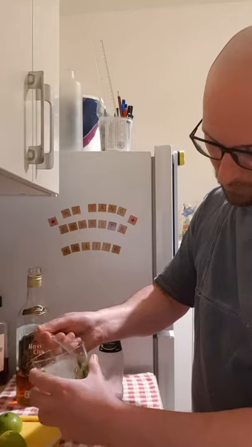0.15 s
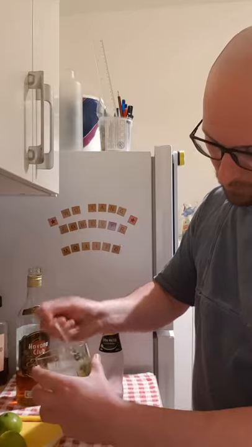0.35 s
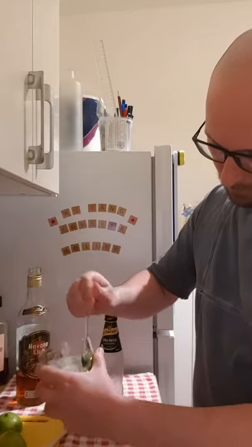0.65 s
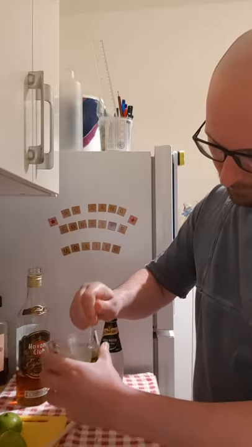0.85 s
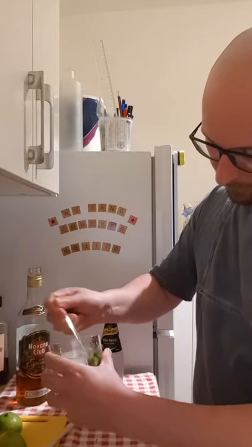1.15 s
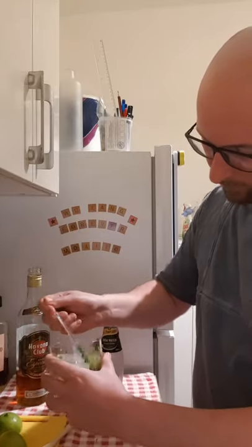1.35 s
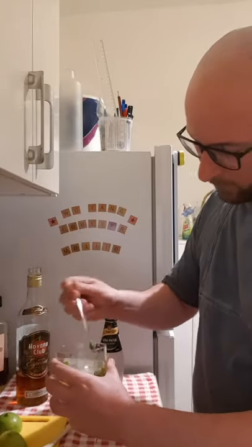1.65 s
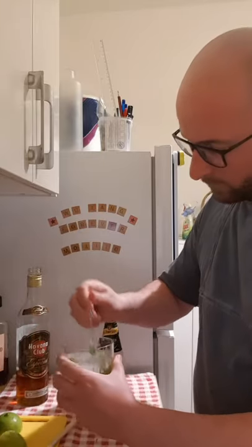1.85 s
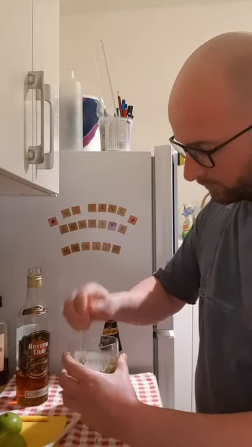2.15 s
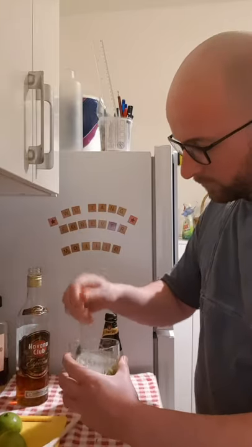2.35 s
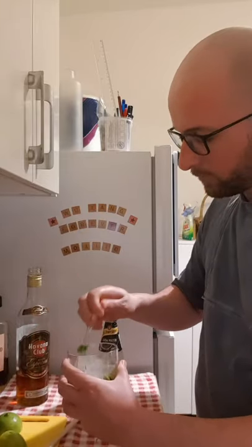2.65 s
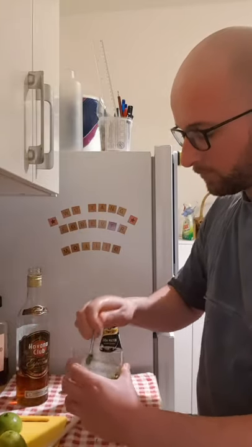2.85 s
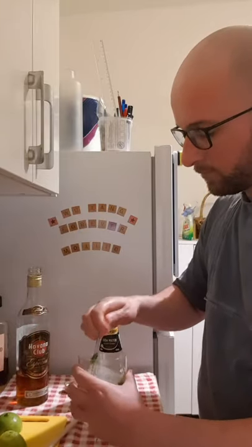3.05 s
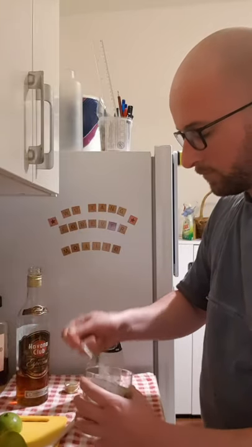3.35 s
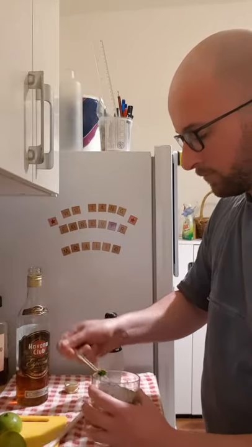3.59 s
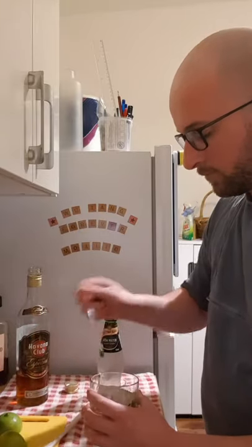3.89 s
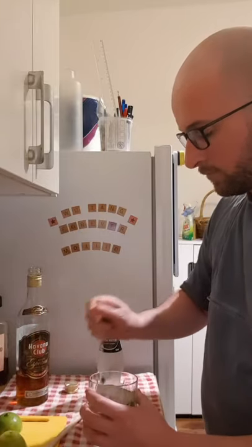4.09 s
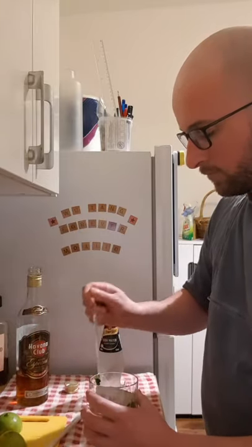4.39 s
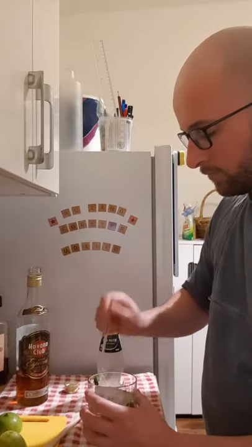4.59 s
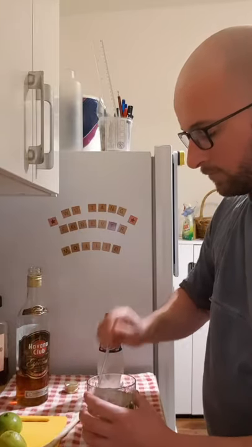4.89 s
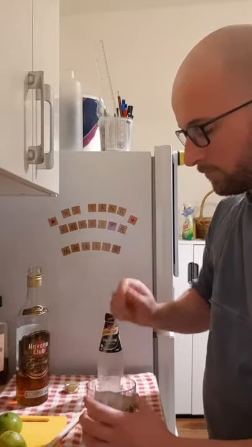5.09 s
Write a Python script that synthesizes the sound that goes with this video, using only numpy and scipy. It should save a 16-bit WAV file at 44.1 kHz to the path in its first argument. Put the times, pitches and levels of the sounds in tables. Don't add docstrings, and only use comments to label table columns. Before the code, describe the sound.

Close, uneven clinks and clacks of spoon and ice in a hand-held glass, with brief scrapes, short room echo and faint fridge whine.

```python
import sys
import numpy as np
from scipy import signal
from scipy.fft import rfft, irfft
from scipy.io import wavfile
from scipy.ndimage import uniform_filter1d

SR = 44100
rng = np.random.default_rng(int(sys.argv[2]) if len(sys.argv) > 2 else 0)


def volts(x):
    e = np.asarray(x, float) / 20
    return 10 ** e


def pcm_store(signal):
    levels = np.round(np.clip(np.atleast_2d(signal), -1, 1) * 32767)
    wavfile.write(sys.argv[1], SR, levels.astype(np.int16).T)


N = 230598


def evened(x):
    return x / np.sqrt(np.mean(x ** 2) + 1e-20)


def read(points, hz):
    f, value = np.transpose(points)
    return np.interp(np.log(hz + 1), np.log(f + 1), value)


def add(mix, start_s, sound):
    part = mix[:, round(start_s * SR):][:, :sound.shape[1]]
    part += sound[:, :part.shape[1]]


def seesaw(db, share, span_db):
    tilt = span_db * (share - 0.5)
    return db - max(tilt, 0), db + min(tilt, 0)


def ring(hz, t60, split_hz, db, luck, rise=0.0011, spread=0.0029):
    aim, phase, port_phase, split, detune, _ = luck
    t = np.arange(6000) / SR
    lean = volts(2.5 * (1.6 * aim - 2.5) * np.array([[1], [-1]]))
    hz = hz * (1 + spread * (2 * detune - 1))
    partner_hz = hz - split_hz * (0.5 + split)
    turn = 2 * np.pi * phase + 2 * port_phase * np.array([[0], [1]])
    pair = np.sin(2 * np.pi * hz * t) + 0.3 * np.sin(2 * np.pi * partner_hz * t + turn)
    pair *= 1 + 0.83 * np.exp(-t / 0.001)
    return volts(db - 60 * t / t60) * (1 - np.exp(-t / rise)) * lean * pair


def burst(colour, db, t60, alike=1.0, size=2048):
    shared, *own = rng.standard_normal((3, size))
    noise = alike * shared + np.sqrt(1 - min(alike, 1) ** 2) * np.array(own)
    gain = volts(read(colour, np.fft.rfftfreq(size, 1 / SR)))
    noise = evened(irfft(rfft(noise) * gain))
    t = np.arange(size) / SR
    return noise * volts(db - 60 * t / t60) * (1 - np.exp(-t / 0.00042))


# start_s, level_db, pitch_hz (lowest ring), wall height 0-1, hardness 0-1
FIRM_BLOWS = [(.0376, -35, 2228, 0.2, 0.4), (.4207, -36, 2053, 0.5, 0.59), (.4525, -45.5, 2030, 0.6, 0.8),
              (0.5586, -48.5, 2195, 0.9, 1.1), (0.7153, -41, 2028, 0.51, 0.35),
              (0.8256, -48.5, 2040, 0.63, 0.77), (1.0934, -20, 2043, 0.22, 0.63),
              (1.0984, -18.5, 1996, 0.67, 0.5), (1.1025, -22.5, 2006, 0.67, 0.45),
              (1.662, -46.5, 2110, 0.6, 0.69), (1.8498, -51, 2056, 0.53, 0.52),
              (2.2155, -25, 2070, 0.13, 0.55), (2.2824, -34.5, 2070, 0.47, 0.39),
              (2.4416, -38, 2115, 0.35, 0.34), (2.5729, -42.5, 2127, .02, 0.24),
              (2.599, -28, 2237, 0.27, 0.39), (2.7733, -18, 2060, 0.3, 0.6),
              (2.8015, -27.5, 2062, 0.38, 0.45), (2.8457, -31, 1963, 0.47, 0),
              (2.8518, -30, 2137, 0.66, 0.73), (2.8605, -32, 2140, 0.7, 0.53),
              (4.2132, -43, 2105, 0.51, 0.84), (4.2832, -30.5, 2056, 0.63, 0.35),
              (4.7788, -31, 2062, 0.41, 0.45), (4.8878, -26.5, 2028, 0.42, 0.57),
              (4.9173, -38.5, 2053, 0.56, 0.32)]
ICE_NUDGES = [(0.018, -44, 2187, .42, 0.26), (.6272, -50, 2020, 0.56, 0), (1.0387, -62, 2190, .38, 0.1),
              (1.0696, -47, 2080, 0.8, 0), (1.6551, -53.5, 2140, .45, 0.7), (1.7104, -56, 2020, 0.1, 0.5),
              (1.7753, -51.5, 2124, 0, 0.2), (1.8122, -54.5, 2050, .03, 0.15),
              (1.9193, -55.5, 2160, 0.58, 0.22), (2.0964, -64, 2140, .14, 0.54),
              (2.3271, -66, 2230, .76, 0.3), (2.653, -44.5, 2260, 0.8, 0.45),
              (3.4399, -55.5, 2030, 0.61, 0.18), (3.5219, -60.5, 2140, 0.9, 0.4),
              (3.6325, -59.5, 2060, 0.63, 0.4), (3.6694, -53, 2040, 1, .6), (3.7406, -54.5, 2106, .1, 0.58),
              (3.7584, -50.5, 2040, 0.58, 0.32)]
# pitch_hz, t60_s, split_hz of the close pair, gain_db
LOW_RINGS = [(2056, 0.036, 51, 8), (2910, 0.046, 40, 5), (4210, 0.04, 70, 3.5)]
# pitch_hz, level_db
THUD_COLOUR = [(250, -27.5), (450, -5), (680, -9.5), (950, -14.5), (1350, -8.5), (1700, -3.5), (2500, -4),
               (3500, -17), (5000, -25.5)]


def knocks():
    blows = FIRM_BLOWS + ICE_NUDGES
    out, luck = np.zeros((2, N)), rng.random((len(blows), 3, 6))
    for (start_s, force_db, low_hz, height, hard), chances in zip(blows, luck):
        shift = low_hz / LOW_RINGS[0][0]
        pitches = [low_hz, 2895 * shift ** 0.45, 4305 * shift ** 0.3]
        lowest_db, second_db = seesaw(force_db, height, 52)
        levels = lowest_db, second_db, force_db - 29.5 + 37 * hard
        for hz, (_, t60, split, gain_db), level, chance in zip(pitches, LOW_RINGS, levels, chances):
            add(out, start_s, ring(hz, t60, split, gain_db + level, chance, spread=0.0019))
        thud_db = -45 + 0.84 * (force_db + 45) + 4.5 - 26.5 * hard
        add(out, start_s, burst(THUD_COLOUR, thud_db, 0.056))
    return out


# start_s, level_db, push
METAL_TICKS = [(.038, -60, 0.57, .1, .14), (.4208, -56.5, 0.6, 0.42, 0.58), (0.5601, -50, 0.36, 0.62, .25),
               (0.7159, -63.5, 0.59, .6, 0.3), (0.8263, -52.5, 0.52, .25, 0.42),
               (1.0933, -39.5, 0.62, 0.46, 0.42), (1.3925, -60.5, 0.12, 1, 1),
               (1.785, -59, 0.41, .51, 0.66), (2.0976, -57.5, 0.54, 0.55, 0.59),
               (2.2118, -60.5, 0.2, .51, 0.35), (2.2161, -44, 0.64, 1, 0.53),
               (2.4213, -53, 0.52, .63, 0.49), (2.4428, -61.5, 0.72, .45, 0.5),
               (2.543, -61.5, 0.1, 0.3, 0.5), (2.5465, -56.5, 0.2, 0.3, 0.45), (2.572, -61, 0.63, .72, 0.3),
               (2.6, -62.5, 0.7, .27, 0.1), (2.774, -46, 0.3, 0.6, .45), (2.8444, -47.5, 0.68, 0.6, 0.45),
               (4.2149, -39.5, 0.28, 0.35, 0.6), (4.2843, -56, 0.4, 0.4, .44),
               (4.741, -47.5, 0.38, 0.6, 0.61), (4.779, -57.5, 0.57, .98, .18),
               (4.888, -51, 0.55, 0.57, 0.3),
               (.9176, -68, 0.45, 0.8, 0.1), (1.0386, -63, 0.3, 0.37, 0.34), (1.071, -67, 0.2, 0.8, 0.2),
                (1.0888, -60, 0.2, 0.4, 0.2), (1.381, -70, .17, 0.54, 0.25), (1.659, -73, 0.84, 0.5, .7),
                (1.8512, -68, 0.82, 0.56, 0.55), (1.9204, -71, .05, 0.85, .32),
                (1.952, -70, 0.07, .83, 0.52), (1.9764, -74, .02, 0.86, .7), (2.19, -65, 0.2, .5, 0.5),
                (2.719, -65, 0.3, .82, .64), (3.0652, -72, 0.5, .72, 0.65), (3.0887, -74, .1, .98, 0.7),
                (3.4256, -62, 0.3, 0.55, 0.56), (3.522, -65, 0.5, 0.86, 0.5),
                (3.634, -76.5, 0.77, .83, .68), (3.74, -79, 0.96, .67, .32), (3.7614, -76, 0.85, .74, .17),
                (5.0106, -69, .16, 0.9, 0.65)]
# pitch_hz, t60_s, split_hz of the close pair, gain_db
HIGH_RINGS = [(6417, 0.037, 30, 2.3), (9120, 0.038, 370, 1.5), (12100, 0.022, 380, 7.1)]
# pitch_hz, level_db
DULL_CRACK = [(1100, -34.5), (1600, -15), (2100, -3), (3400, -8), (5200, 0.5), (7200, -2), (8000, -8),
              (9000, -29)]
# pitch_hz, level_db
BRIGHT_CRACK = [(6000, -33.5), (9000, -5), (10800, 1.5), (12300, -0.5), (14000, -2), (16500, -8)]


def ticks():
    contacts = METAL_TICKS
    out, luck = np.zeros((2, N)), rng.random((len(contacts), 3, 6))
    for (start_s, force_db, push, loose, sharp), chances in zip(contacts, luck):
        rim_db, spoon_db = seesaw(force_db, loose, 60.5)
        dull_db, bright_db = seesaw(force_db, sharp, 52.5)
        wall_db = force_db - 13 + 45.5 * push
        levels = wall_db, rim_db + 9, spoon_db + 5.5
        for (hz, t60, split, gain_db), level, chance in zip(HIGH_RINGS, levels, chances):
            add(out, start_s, ring(hz, t60, split, gain_db + level, chance, rise=0.00086))
        dull = burst(DULL_CRACK, dull_db + 17.5, 0.019)
        bright = burst(BRIGHT_CRACK, bright_db + 14.5, 0.029)
        add(out, start_s, dull + bright)
    return out


# start_s, pitch_hz, level_db,
# t60_s
DEAD_CONTACTS = [(0.0372, 2000, -21, 0.0098), (0.038, 1610, -29.5, 0.023), (0.039, 1370, -40, 0.03),
                 (0.02, 1550, -47, 0.02), (0.61, 4100, -46, 0.034), (0.89, 1800, -40, 0.0038),
                 (0.827, 2900, -38.5, 0.023), (.8264, 3180, -31.5, .0086), (1.0935, 3430, -33.5, 0.026),
                 (1.094, 1355, -26, 0.05), (1.0945, 1555, -29, 0.04), (1.095, 2190, -23, 0.046),
                 (1.097, 2340, -27, 0.035), (1.096, 4120, -30, 0.051), (1.0942, 4245, -24.5, 0.056),
                 (2.217, 4306, -33.5, 0.025), (2.779, 4312, -33, 0.057), (1.0945, 10000, -34, .008),
                 (2.216, 1430, -37.5, 0.0096), (2.2, 420, -50.5, 0.027), (2.599, 1775, -36.5, 0.033),
                 (2.774, 3520, -34.5, 0.012), (2.846, 661, -33.5, 0.025), (2.8462, 5370, -46, 0.0088),
                 (2.851, 2480, -28, 0.011), (3.425, 2520, -54, 0.0093), (3.543, 3530, -57, 0.044),
                 (3.663, 2800, -54, 0.051), (4.2137, 6250, -21, 0.0088), (4.2158, 6280, -16, 0.0091),
                 (4.2126, 2700, -34, 0.0072), (4.2138, 7320, -17.5, 0.012), (4.2136, 3960, -32, 0.0081),
                 (4.2162, 3000, -33, 0.02), (4.3, 4660, -38.5, 0.018), (4.7787, 674, -41.5, 0.045),
                 (4.888, 770, -41, 0.021), (6.4, 2200, -37, 0.031), (2.8465, 1566, -33, 0.03)]


def clacks():
    out, luck = np.zeros((2, N)), rng.random((len(DEAD_CONTACTS), 6))
    for (start_s, hz, db, t60), chance in zip(DEAD_CONTACTS, luck):
        add(out, start_s, ring(hz, t60, 3.7 / t60, db, chance, rise=0.00081))
    return out


# pitch_hz, level_db
SPLASH_COLOUR = [(1200, -31.5), (1900, 2.5), (2250, 5.5), (2600, -3), (3300, 1), (4000, -1), (5300, -5),
                 (7500, -14)]


def splash():
    out = np.zeros((2, N))
    for start_s, force_db, *_ in FIRM_BLOWS + ICE_NUDGES:
        add(out, start_s, burst(SPLASH_COLOUR, force_db - 16, 0.049, alike=0.9))
    return out


# start_s, level_db (pressure)
STROKES = [
    [(1.67, -58), (1.702, -65), (1.846, -63.5), (1.854, -57), (1.878, -75), (1.944, -62), (2.05, -99)],
    [(2.806, -48.5), (2.842, -49.5), (2.846, -34.5), (2.862, -35), (2.885, -52)],
    [(4.214, -36), (4.235, -41), (4.28, -45), (4.33, -57)],
    [(3.43, -58.5), (3.51, -67), (3.524, -65), (3.578, -60.5), (3.774, -54), (3.78, -74.5), (3.92, -76)],
]
# pitch_hz, level_db
SCRATCH = [(1500, -48), (2500, -18), (5000, -11.5), (7500, -21), (11000, -26.5), (16000, -28)]
SLIDE_RINGS_DB = [-4.5, -8, -7.5, -2, -14, -12]


def slides():
    slips_per_s = 1500
    slips = (rng.random(N) < slips_per_s / SR) * volts(rng.exponential(1, N)) * rng.standard_normal(N)
    f = np.fft.rfftfreq(N, 1 / SR)
    wall = volts(read(SCRATCH, f)) + 0j
    for (hz, t60, *_), db in zip(LOW_RINGS + HIGH_RINGS, SLIDE_RINGS_DB):
        wall += volts(db) / (1 + 2j * (f - hz) / (7.7 / t60))
    t, pressure = np.arange(N) / SR, np.zeros(N)
    for s, db in map(np.transpose, STROKES):
        fade = np.clip(np.minimum(t - s[0], s[-1] - t) / 0.0023, 0, 1)
        pressure += fade * volts(np.interp(t, s, db) - 4.0)
    steady = irfft(rfft(slips) * wall, N)
    return irfft(rfft(slips * pressure) * wall, N) / np.std(steady)


# delay_s, level_db
ECHOES = [(.0028, 6), (.006, -0.5), (.011, -24.5), (0.016, -2), (0.027, -8.5)]
# pitch_hz, t60_s
ROOM_DECAY = [(300, 0.64), (790, 0.39), (2090, 0.57), (5510, 0.53), (14600, 0.32)]


def kitchen(x):
    tail_db, near_db, turns_per_s, build_s = -4.5, -10.0, 0.5946, 0.0094
    taps = np.zeros((3, 2, 32000))
    at = np.arange(300, 31900, 20) + rng.integers(0, 20, (3, 2, 1580))
    np.put_along_axis(taps, at, rng.choice([-1., 1.], at.shape), 2)
    hz, t, z = signal.stft(taps, SR, nperseg=256)
    decay = volts(-60 * t / read(ROOM_DECAY, hz)[:, None])
    fill = 1 - np.exp(-t / build_s)
    tail = signal.istft(z * decay * fill, SR, nperseg=256)[1]
    tail *= volts(tail_db) / np.linalg.norm(tail[0, 0])
    for delay_s, db in ECHOES:
        at = np.round(delay_s * SR * rng.uniform(0.85, 1.15, (3, 2, 1))).astype(int)
        np.put_along_axis(tail, at, volts(db + near_db), 2)
    turn = np.arange(N) / SR * turns_per_s + np.arange(3)[:, None] / 3
    shares = np.sqrt(2 / 3) * np.cos(2 * np.pi * turn)
    return signal.oaconvolve((shares * x.mean(0))[:, None], tail, axes=2)[..., :N].sum(0)


# pitch_hz, level_db
EARLIER_COLOUR = [(900, -0.5), (1800, -7.5), (2300, -4), (4000, -7.5), (7000, -16), (8500, -20.5),
                  (16000, -42)]


def earlier_clink():
    return burst(EARLIER_COLOUR, -52.5, 3.8, alike=0.13, size=32768)


# pitch_hz, level_db (per Hz)
AIR_COLOUR = [(36, -36.5), (62, -6.5), (186, -6.5), (570, -12.5), (656, -10.5), (829, -17.5), (1100, -14),
              (1520, -20.5), (5500, -32), (8380, -40.5), (11100, -33), (15000, -30.5), (16500, -47.5)]
# pitch_hz, likeness 0-1
LIKENESS = [(60, 0.97), (180, 0.94), (550, 0.66), (1650, 0.03), (4970, 0.04), (15000, 0.1)]
# start_s, level_db
BACKGROUND_SWELL = [(0.0, -59.5), (0.31, -63), (0.74, -60.5), (0.9, -64), (1.37, -61), (1.49, -64.5),
                    (1.79, -58), (2.3, -60.5), (2.72, -57.5), (3.28, -60), (4.05, -56.5), (4.56, -60),
                    (4.86, -53), (5.23, -59.5)]
# pitch_hz, width_hz, level_db
FRIDGE_LINES = [(46.3, 7.5, -71), (114.5, 6.2, -67), (88, 13, -63.5), (186.5, 7.3, -66.5), (223, 10, -73.5),
                (272.3, 8, -72.5), (671.2, 14, -69)]


def air():
    rumble_follows, hiss_follows, lines_follow = 0.98, 0.3, 0.82
    frames, hz = N // 512 + 5, np.fft.rfftfreq(2048, 1 / SR)
    a, b, c, d = rng.standard_normal((frames, 1025, 4)).T
    same = np.clip(read(LIKENESS, hz), -1, 1)[:, None]
    left = a + 1j * b
    right = same * left + np.sqrt(1 - same ** 2) * (c + 1j * d)
    s, swell_db = np.transpose(BACKGROUND_SWELL)
    swell_db = swell_db - swell_db.mean()
    t = np.arange(frames) * 512 / SR
    bass = np.clip((170 - hz[:, None]) / 60, 0, 1)
    follow = (bass * rumble_follows + (1 - bass) * hiss_follows) * np.interp(t, s, swell_db)
    z = np.array([left, right]) * volts(read(AIR_COLOUR, hz)[:, None] + follow)
    wash = volts(-58.5) * evened(signal.istft(z, nperseg=2048, noverlap=1536)[1][:, :N])
    level = volts(lines_follow * np.interp(np.arange(N) / SR, s, swell_db))
    for f, width, db in FRIDGE_LINES:
        r, like = np.exp(-np.pi * width / SR), np.clip(read(LIKENESS, f), -1, 1)
        resonator = [1, -2 * r * np.cos(2 * np.pi * f / SR), r * r]
        u, v = signal.lfilter([1], resonator, rng.standard_normal((2, N)))
        line = evened(np.array([u, like * u + np.sqrt(1 - like ** 2) * v]))
        wash += volts(db) * level * line
    return wash


# pitch_hz, waver_hz, level_db, lean to the right port in dB
COMPRESSOR_TONE = (1084, 4.5, -66.5, 3.5)


def whine():
    hz, waver_hz, db, lean_db = COMPRESSOR_TONE
    noises = rng.standard_normal((2, N))
    pitch, strength = [evened(uniform_filter1d(uniform_filter1d(v, 2500), 2500)) for v in noises]
    phase = 2 * np.pi * np.cumsum(hz + waver_hz * pitch) / SR
    tone = np.sqrt(2) * np.sin(phase + np.array([[2.], [0.]]))
    return tone * volts(db + 1.9 * strength + lean_db * np.array([[-1], [1]]))


# pitch_hz, width_hz, depth_db
PORT_DIP = (8600, 980, 4.6)


def microphone_port(x):
    hz, (dip_hz, width, depth_db) = np.fft.rfftfreq(1024, 1 / SR), PORT_DIP
    dip = volts(-depth_db * np.exp(-((hz - dip_hz) / width) ** 2))
    return signal.oaconvolve(x, signal.firwin2(255, hz, dip, fs=SR)[None], "same", axes=1)


def scene():
    crowd = splash()
    glass = knocks() + ticks() + clacks() + slides() + crowd
    lag = 3
    near = np.array([np.roll(glass[0], lag), glass[1]]) * volts([[-3.], [3.]])
    to_room = glass + (volts(6) - 1) * crowd
    heard = near + kitchen(to_room) * volts([[-1.5], [1.5]])
    add(heard, 0, earlier_clink())
    side = (heard[0] - heard[1]) / 2
    long_side = signal.oaconvolve(side, signal.firwin(255, 1105, fs=SR), "same")
    heard = heard - 0.61 * long_side * np.array([[1], [-1]])
    return microphone_port(heard + air() + whine())


def roll_off(x):
    return signal.sosfilt(signal.butter(12, 16640, fs=SR, output="sos"), x)


def record(dry):
    band = 0.8 * np.tanh(dry / 0.8)
    band = signal.sosfilt(signal.butter(4, 36., "high", fs=SR, output="sos"), band)
    band = signal.sosfilt(signal.cheby2(10, 50, 16400., fs=SR, output="sos"), band)
    return roll_off(band)


dry = scene()
out = record(dry)
pcm_store(out)
```